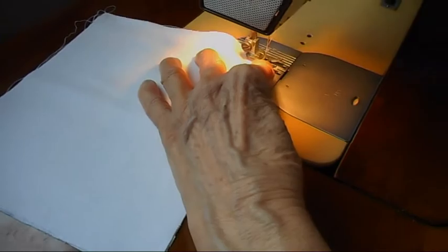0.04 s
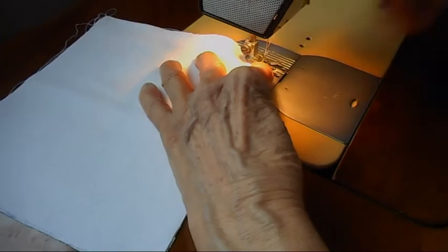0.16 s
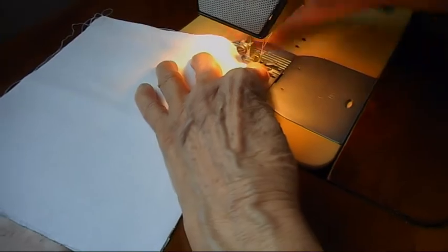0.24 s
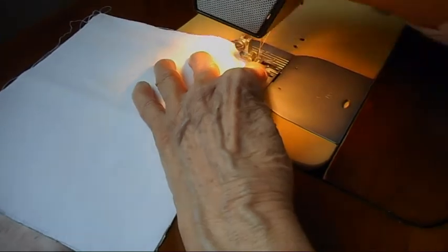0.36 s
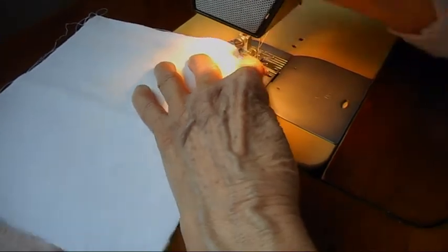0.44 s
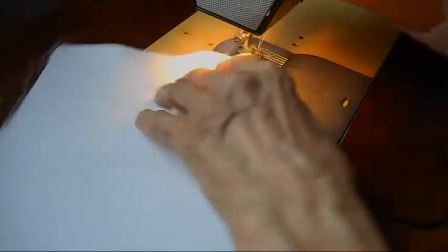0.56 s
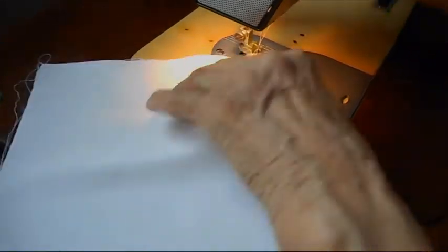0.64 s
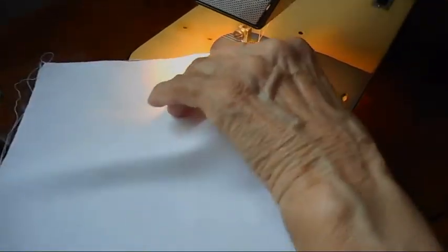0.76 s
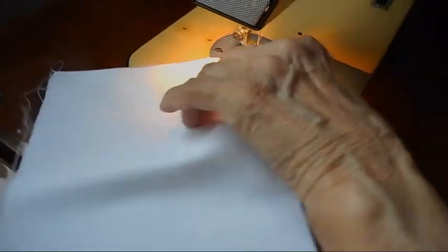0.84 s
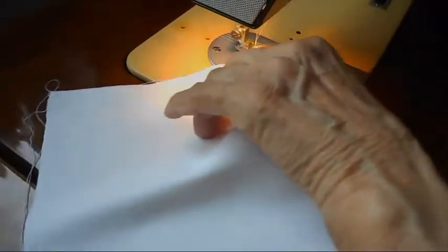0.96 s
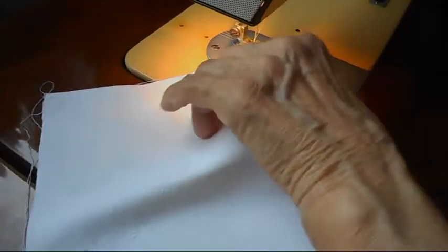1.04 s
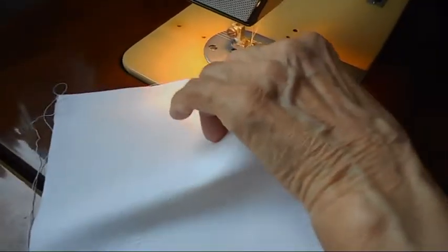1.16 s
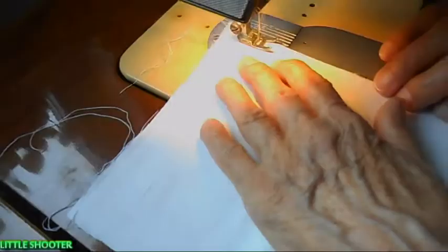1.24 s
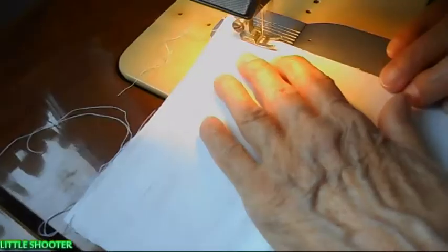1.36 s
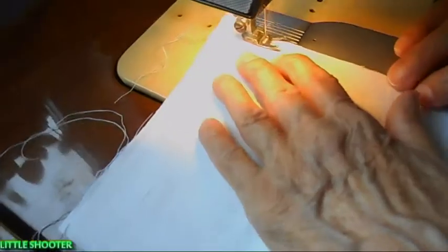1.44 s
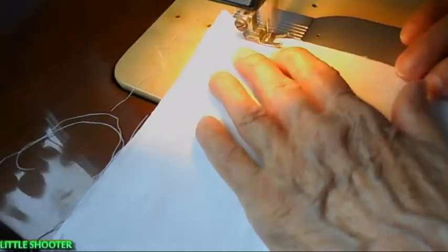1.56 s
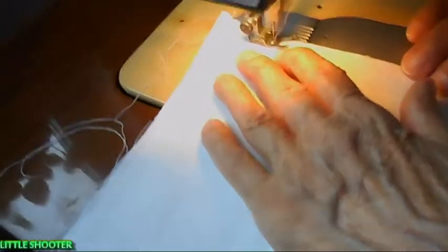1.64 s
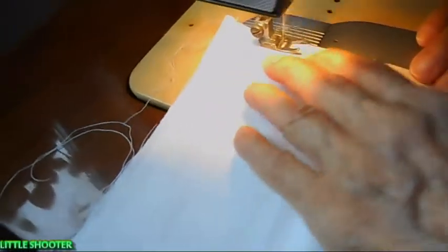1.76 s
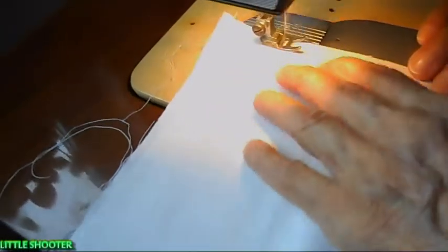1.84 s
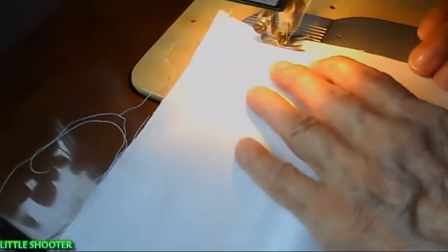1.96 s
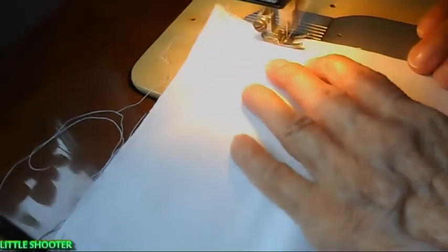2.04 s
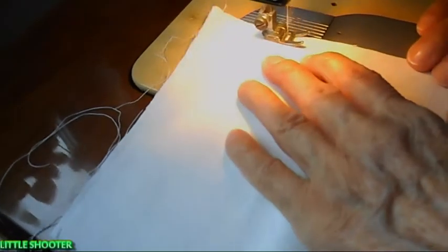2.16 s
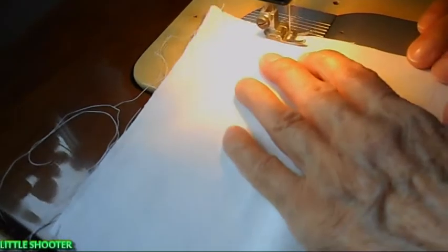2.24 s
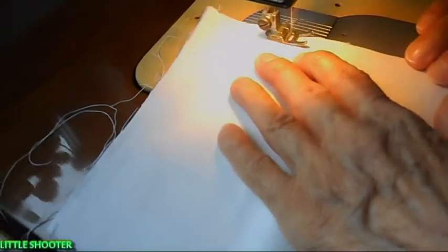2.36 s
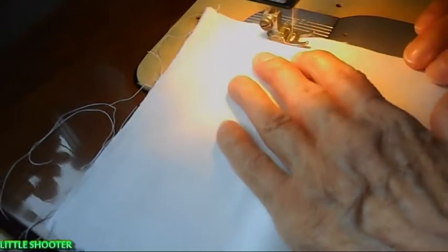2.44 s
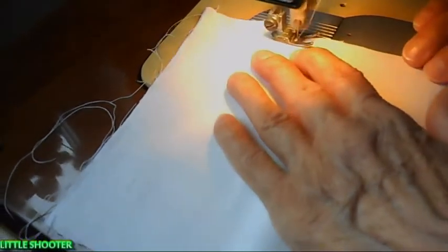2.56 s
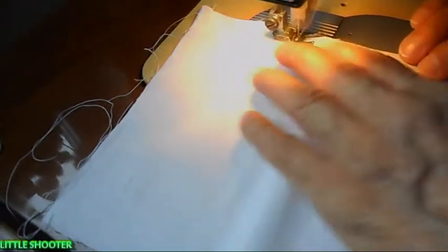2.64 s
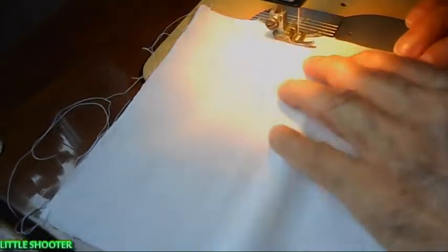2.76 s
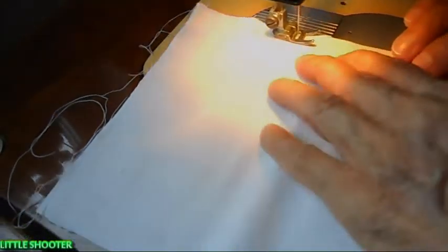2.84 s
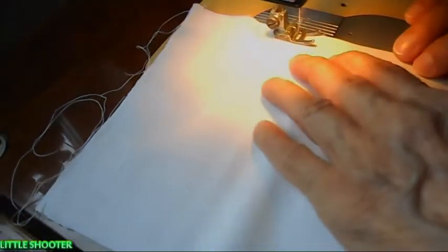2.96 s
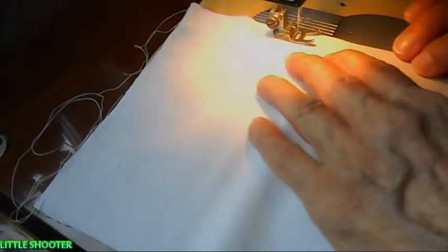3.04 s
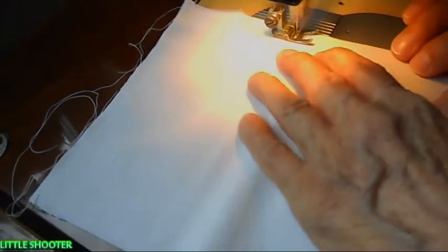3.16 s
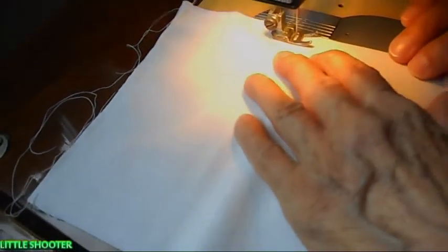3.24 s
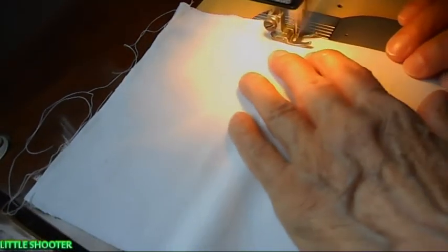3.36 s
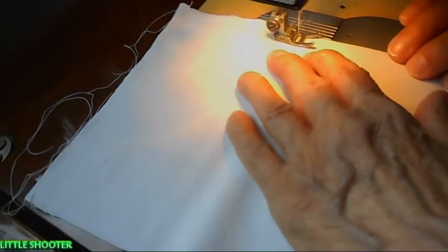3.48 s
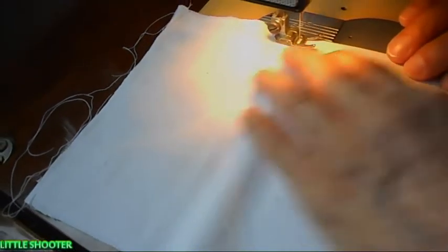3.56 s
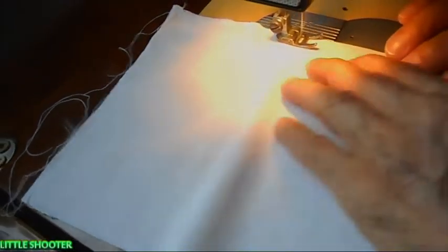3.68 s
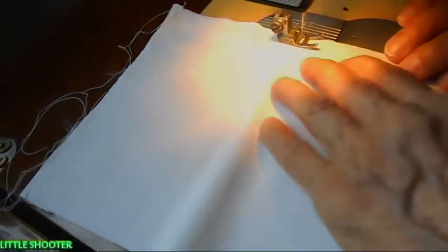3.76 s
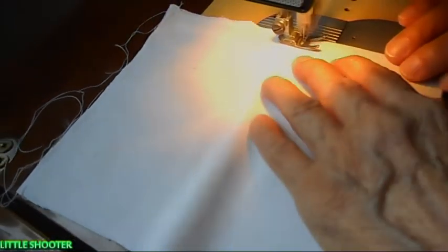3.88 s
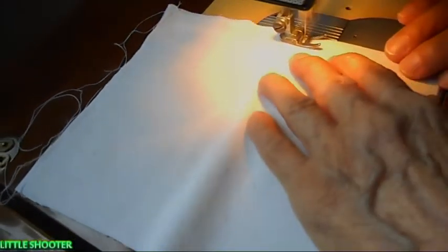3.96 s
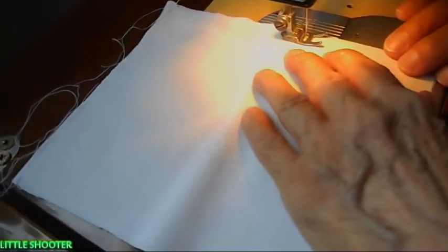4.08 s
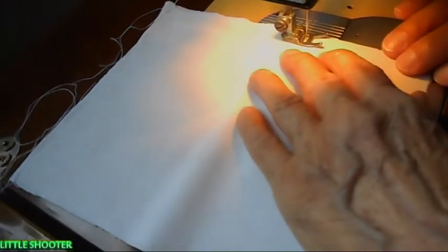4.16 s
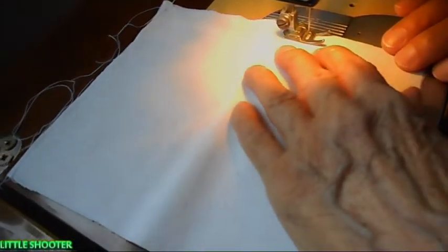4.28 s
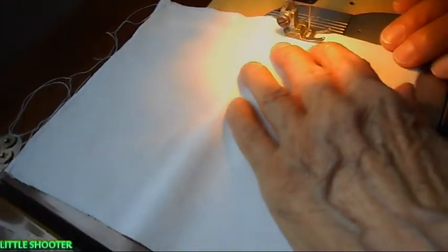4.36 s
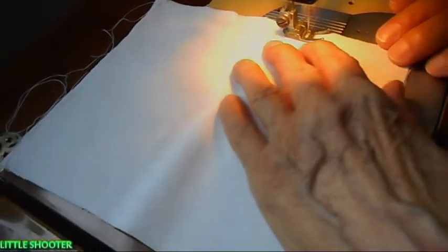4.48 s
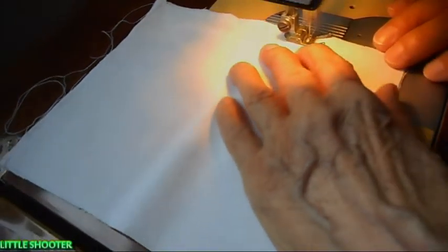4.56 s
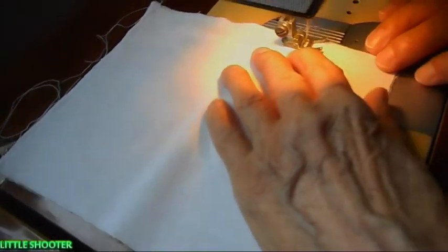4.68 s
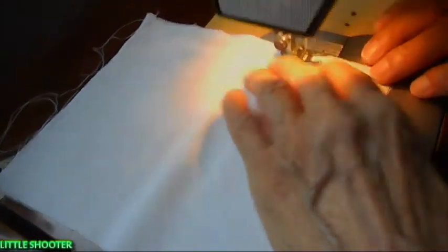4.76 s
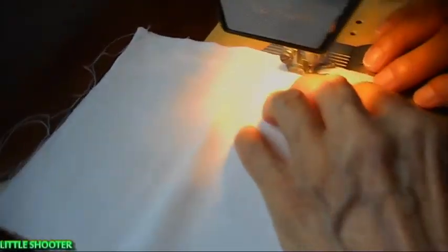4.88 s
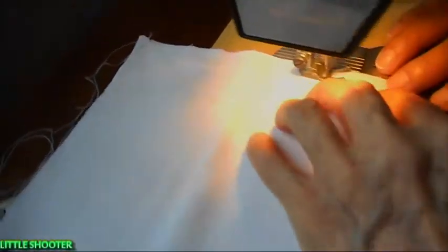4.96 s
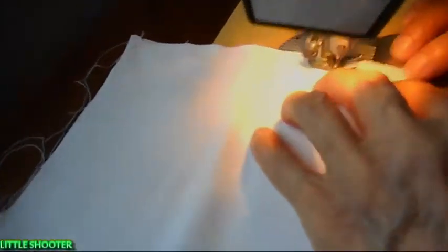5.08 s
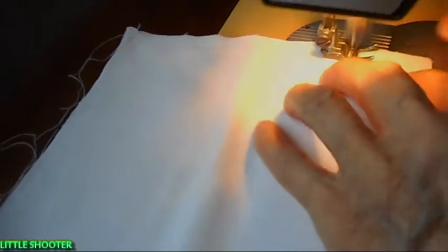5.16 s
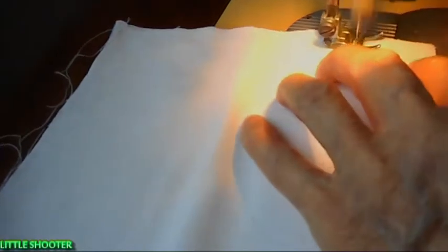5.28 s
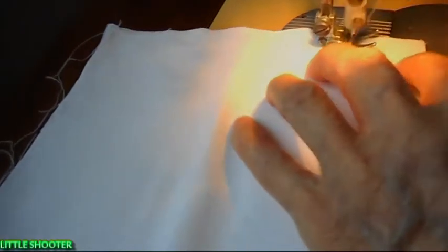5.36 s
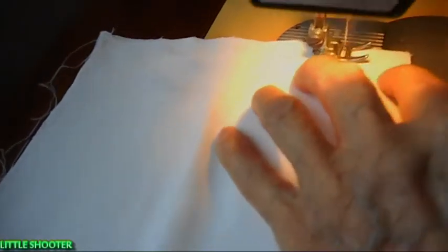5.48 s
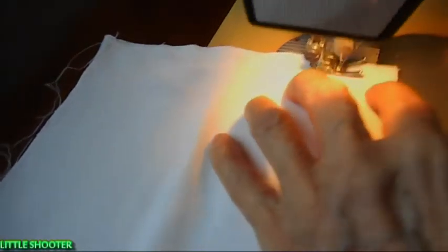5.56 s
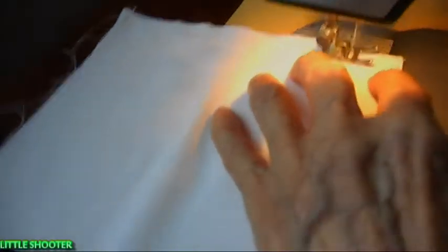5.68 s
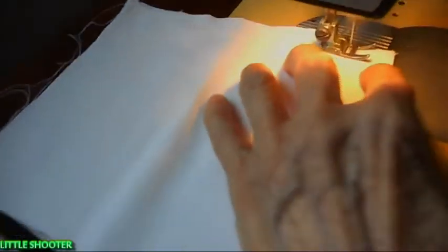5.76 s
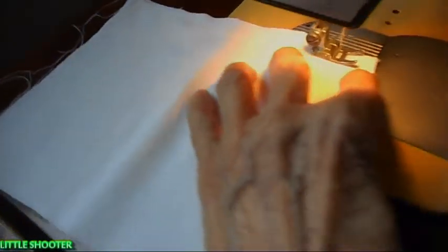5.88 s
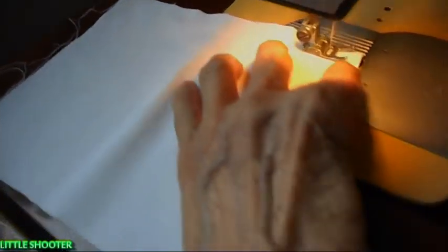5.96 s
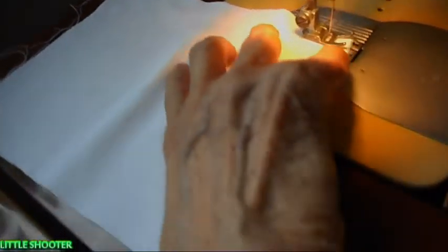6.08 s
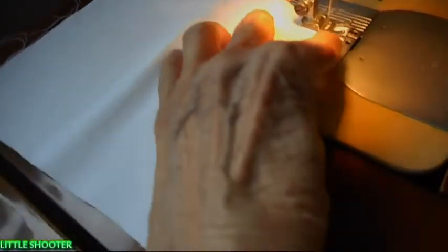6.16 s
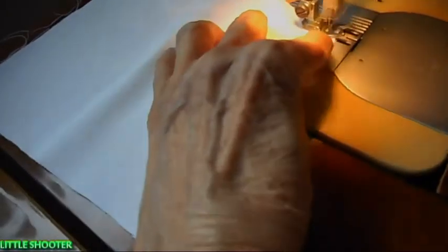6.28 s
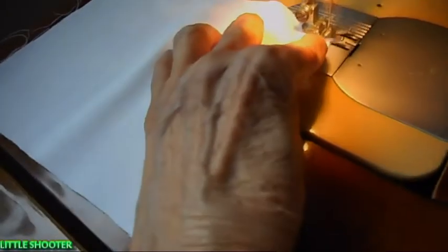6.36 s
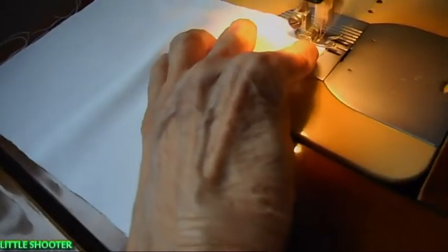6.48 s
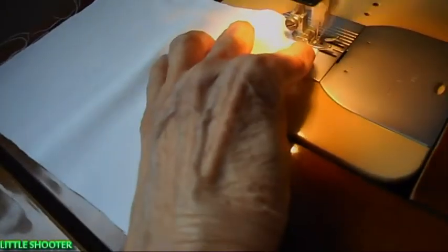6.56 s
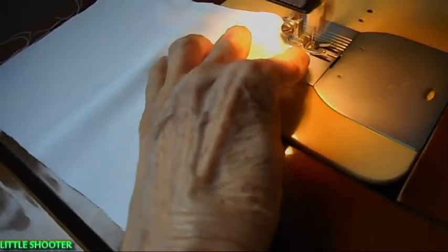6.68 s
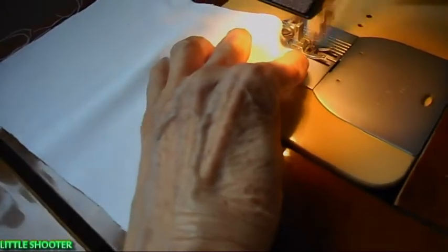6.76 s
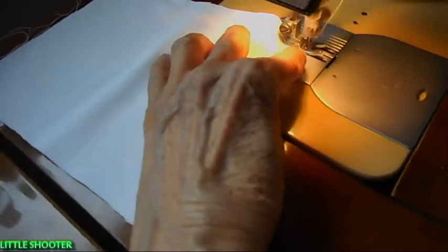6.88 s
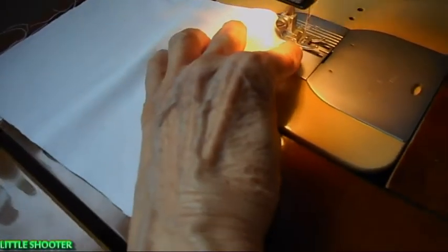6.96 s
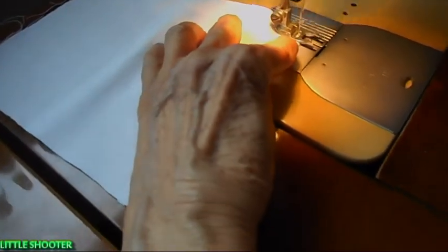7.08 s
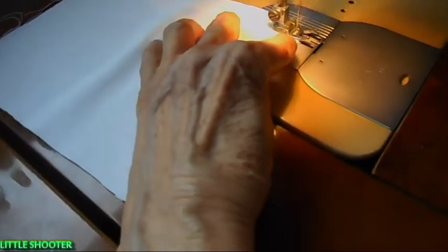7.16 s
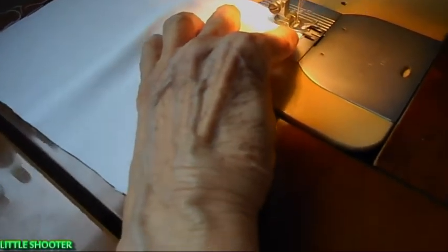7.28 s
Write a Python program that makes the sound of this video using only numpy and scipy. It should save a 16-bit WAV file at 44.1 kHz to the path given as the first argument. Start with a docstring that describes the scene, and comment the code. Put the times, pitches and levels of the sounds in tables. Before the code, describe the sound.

Metal clicks and two hard knocks on a hollow machine bed, a brief gap, then rapid sewing machine stitching with a clunk and scrape.

```python
"""A quiet room first, with the presser foot's lever clicking and two main knocks on the hollow machine bed.
After a short silent gap an electric sewing machine runs close to the microphone, about eleven stitches a second.
Its needle bar, hook and feed teeth clack over the rumble of motor and belt, with chatter, and once a heavy clunk
with a short rattle, then a brief metallic scrape.
Shaped noise makes room, rumble, clunk and scrape; bursts of noise through resonances make the other contacts."""
import sys
import numpy as np
from scipy import signal
from scipy.fft import rfft, irfft, next_fast_len
from scipy.io import wavfile
from scipy.ndimage import map_coordinates

SR = 44100
rng = np.random.default_rng(int(sys.argv[2]) if len(sys.argv) > 2 else 0)


def unload_wav(signal):
    """Save mono or channel-first audio to the path in sys.argv[1] as 16-bit WAV at rate SR, clipped to [-1, 1]."""
    wavfile.write(
        sys.argv[1],
        SR,
        np.round(np.clip(np.atleast_2d(signal).T, -1, 1) * 32767).astype(np.int16),
    )


N = 323253

# Levels and gains are relative dB. A t60 is the time in seconds to fall by 60 dB.
# Hiss of the quiet room. Each row: time in seconds, level in dB.
ROOM_LEVEL = [(0.0, -58), (.5, -55.5), (.55, -53), (.65, -55), (0.986, -54.5), (1.21, -53)]
# Colour of the room hiss. Each row: frequency in Hz, gain in dB.
ROOM_COLOUR = [(15, -53), (25, -23), (104, -11), (585, -3), (815, -3), (998, 0), (1390, -3), (3750, -4),
               (7830, -10.5), (9600, -18), (10900, -37), (14200, -68), (22000, -120)]
# Blows and rebounds on the bed. Each row: start in seconds, peak level in dB, t60 in seconds.
BED_KNOCKS = [(0.941, -8, 0.052), (0.949, -25, 0.16), (0.97, -14, 0.089), (0.989, -31, 0.091),
              (1.075, -8.5, 0.086), (1.102, -19.5, 0.064), (1.116, -30, 0.1), (1.204, -29, 0.1)]
# Colour of a blow. Each row: frequency in Hz, gain in dB.
BLOW_COLOUR = [(24, -64), (40, -44), (261, -13.5), (355, -20), (459, -7), (950, -5), (1670, -17),
               (3070, -28.5), (5270, -30.5), (10900, -52), (14200, -95), (22000, -120)]
# Resonances of the hollow bed. Each row: frequency in Hz, width in Hz, level in dB.
BED_MODES = [(462, 31, 2.5), (718, 38, 5), (962, 51, -3), (1121, 31, 2), (1640, 110, -3), (1943, 90, 5),
             (2760, 110, -1)]
# Lever and cloth handling. Each row: start in seconds, level in dB, loudest ring in Hz,
# thud against the contact in dB, t60 in seconds.
LEVER_CONTACTS = [(0.1484, -39, 3660, -16, 0.021), (0.161, -42, 4070, -20, 0.012),
                  (0.2523, -38, 2860, -20, 0.012), (0.309, -18, 3800, -42, 0.008),
                  (0.3416, -39.5, 3160, -2, 0.014), (0.3758, -24, 2140, -12, 0.018),
                  (0.3935, -24.5, 3870, -5, 0.021), (0.4306, -33, 3120, -17, 0.045),
                  (0.4677, -35, 2050, -3, 0.02), (0.546, -41, 2180, -10, 0.021),
                  (0.7053, -37.5, 5700, -8, 0.016), (0.8677, -38, 3080, -18, 0.014),
                  (1.1916, -38, 3290, -8, 0.018)]
# Silence before the machine. One row: start in seconds, end in seconds.
SILENT_GAP = (1.2135, 1.2525)
# The running machine. Each row: time in seconds, casing rumble in dB, chatter of small parts in dB.
RUNNING_LEVELS = [(1.25, -32, -30.5), (1.32, -33.5, -31.5), (1.42, -32, -31), (1.46, -33.5, -28.5),
                  (1.68, -33, -32), (1.93, -34, -31.5), (2.1, -32.5, -30.5), (3.72, -34, -31),
                  (4.3, -33, -30), (5.57, -33, -31.5), (6.06, -33.5, -30.5), (6.38, -33.5, -29.5),
                  (6.62, -33.5, -31), (6.96, -35.5, -35.5), (7.13, -34.5, -35.5), (7.33, -33.5, -31)]
# Colour of the rumble. Each row: frequency in Hz, gain in dB.
RUMBLE_COLOUR = [(25, -76), (100, -31), (250, -18), (420, -10.5), (900, -5), (1500, -5.5), (2500, -9.5),
                 (6000, -15.5), (10900, -70)]
# Resonances of the casing. Each row: frequency in Hz, width in Hz, level in dB.
CASING_MODES = [(518.2, 57, 5.5), (786, 46.5, 6), (1070, 182, -2.5), (1325, 61, 1.5)]
# Progress of the main shaft. Each row: time in seconds, stitches begun.
SHAFT_STITCHES = [(1.271, 0), (1.525, 3), (1.774, 6), (2.02, 9), (2.114, 10), (2.372, 13), (2.721, 17),
                  (2.975, 20), (3.425, 25), (3.875, 30), (4.217, 34), (4.4, 36), (4.784, 40), (5.332, 46),
                  (5.813, 51), (6.175, 55), (6.78, 62), (7.322, 67)]
# One turn of the shaft; the needle bar lands at 0, the feed teeth near .3.
# Each row: share of the stitch, usual t60 of a clack in seconds, its thud in dB, chatter in dB.
STITCH_CYCLE = [(0, .027, -14, 2.5), (.12, .016, -19.5, 1.5), (.29, .019, -7, 6), (.42, .013, -18, -0.5),
                (.58, .014, -22, -2), (.68, .014, -26, 4.5), (.77, .013, -10, -3.5), (.87, .012, -12, 0),
                (.95, .016, -24, 0.5)]
# Colour of metal on metal. Each row: frequency in Hz, gain in dB.
CONTACT_COLOUR = [(880, -22), (1500, -4.5), (3710, 1), (4090, -1), (6630, 0.5), (7440, 1.5), (9470, -9),
                  (9950, -13), (10900, -21.5), (14200, -67), (22000, -120)]
# Resonances of the steel parts. Each row: frequency in Hz, width in Hz, level in dB.
STEEL_MODES = [(2030, 220, -9), (2702, 100, 3.5), (3500, 100, -14), (4584, 65, 1), (5760, 310, -22),
               (7130, 120, -10), (7300, 330, -45)]
# Colour of a thud into the arm. Each row: frequency in Hz, gain in dB.
THUD_COLOUR = [(40, -62), (100, -35), (200, -13), (500, -13.5), (1000, -8.5), (1350, 5.5), (1700, -12),
               (2500, -33.5)]
# A heavy clunk with a short rattle, then a brief metallic scrape. Each row: start in seconds,
# length in seconds, level in dB, ring of the needle plate in dB, thud in the arm in dB.
CLUNK_AND_SCRAPE = [(6.516, 0.014, -21, -17, 6), (6.532, 0.044, -28, -19, -6), (6.598, 0.013, -17, 18, -8)]
# Resonances of the needle plate. Each row: frequency in Hz, width in Hz, level in dB.
PLATE_MODES = [(6880, 190, -8), (7310, 99, -6), (7400, 140, -6), (9600, 190, 5), (10200, 100, 5)]
# The loudest metal contacts. Each row: start in seconds, level in dB, loudest ring in Hz,
# length as a multiple of the usual one at that place in the stitch.
CLACK_EVENTS = [(1.2705, -14, 2950, 1.5), (1.297, -14.5, 2080, 1.05), (1.3404, -14.5, 2940, 0.9),
                (1.4411, -8.5, 3000, 1.05), (1.4774, -16, 6410, 0.91), (1.525, -13, 2720, 1.3),
                (1.555, -11, 6750, 0.99), (1.5825, -16, 5700, 0.76), (1.5924, -15.5, 5270, 1.1),
                (1.612, -11, 5940, 1.1), (1.656, -14, 5200, 1.2), (1.679, -9.5, 2940, 1.2),
                (1.6905, -10, 6000, 1.3), (1.7084, -13, 7300, 0.78), (1.728, -8.5, 6720, 0.98),
                (1.7418, -12.5, 3200, 1.05), (1.773, -8.5, 2240, 1.05), (1.8145, -12, 4400, 1.1),
                (1.844, -7, 6300, 1), (1.8556, -12, 2800, 1.2), (1.88, -7.5, 3300, 0.87),
                (1.9127, -14, 7440, 0.93), (1.938, -6.5, 2830, 0.84), (1.963, -0.5, 5850, 0.82),
                (1.9708, -9, 6700, 1.3), (2.0197, -9.5, 2840, 1.3), (2.0575, -5.5, 6700, 1.16),
                (2.1143, -6.5, 5970, 0.79), (2.14, -9, 6360, 1.2), (2.2358, -5.5, 6700, 1),
                (2.2892, -15.5, 5950, 1.2), (2.3085, -11, 3800, 0.76), (2.3374, -15, 5090, 1.05),
                (2.3725, -8.5, 7460, 0.65), (2.392, -15, 3990, 1.3), (2.4564, -9.5, 5600, 0.98),
                (2.4787, -23, 3900, 0.96), (2.6316, -14, 2700, 1.05), (2.6723, -13.5, 4370, 1.4),
                (2.7202, -7.5, 5870, 1.05), (2.7487, -12.5, 6820, 1.05), (2.9107, 0, 4700, 0.92),
                (2.9744, -9, 2703, 1.15), (3.0016, -5, 2060, 1.02), (3.066, -6, 5800, 0.62),
                (3.0964, -11.5, 6500, 1.2), (3.1817, -3, 5150, 1.13), (3.243, -9.5, 5840, 1.05),
                (3.2668, -11, 1960, 1.1), (3.4246, -10, 2600, 0.79), (3.4517, -1.5, 3750, 0.97),
                (3.5886, -13, 3300, 0.94), (3.6416, -11, 6250, 1.05), (3.6601, -16, 5620, 1.6),
                (3.715, -22, 3570, 1.2), (3.8153, -16.5, 4540, 1.5), (3.8546, -14.5, 5120, 1.1),
                (3.8766, -9.5, 2670, 0.78), (3.8967, -10.5, 5190, 1.3), (3.9634, -12, 3120, 1.05),
                (4.0073, -12, 4470, 0.93), (4.0494, -7, 6180, 0.93), (4.0694, -13.5, 3740, 1.05),
                (4.083, -12.5, 4360, 1.1), (4.161, -11, 3770, 0.66), (4.1756, -12, 5140, 1.05),
                (4.2068, -11, 6600, 1.4), (4.2166, -8.5, 5900, 0.88), (4.25, -10, 6860, 1.7),
                (4.321, -12, 6960, 0.66), (4.349, -16, 3180, 0.87), (4.377, -12.5, 2940, 1.3),
                (4.4079, -5, 6400, 0.79), (4.445, -12, 7470, 0.75), (4.4807, -5.5, 3660, 1.2),
                (4.5423, -12, 3020, 1.6), (4.576, -7.5, 1900, 1.14), (4.6115, -13, 7400, 1.05),
                (4.624, -5, 5760, 1.3), (4.659, -12, 6840, 0.72), (4.728, -14, 3300, 1.3),
                (4.785, -6.5, 5900, 1.03), (4.815, 0, 5900, 1.1), (4.8762, -9, 5640, 1.3),
                (4.9343, -14.5, 3250, 1.4), (4.9668, -8.5, 5730, 0.96), (4.981, -9, 6700, 0.83),
                (5.0594, -8, 2270, 0.82), (5.0821, -10.5, 3570, 0.67), (5.0938, -11, 1930, 0.71),
                (5.1459, -8, 2730, 1.14), (5.1806, -12, 6220, 1.05), (5.243, -12.5, 2200, 0.85),
                (5.2683, -9.5, 4600, 1.6), (5.3307, -11.5, 2170, 1.3), (5.36, -14.5, 4520, 0.83),
                (5.5542, -12, 3760, 0.71), (5.6521, -13.5, 6600, 1.2), (5.7176, -5.5, 6070, 0.64),
                (5.741, -17, 4420, 1.1), (5.7803, -14.5, 3330, 1.05), (5.813, -14, 2260, 1.4),
                (5.831, -7.5, 3670, 1.4), (6.0373, -12.5, 6850, 1.05), (6.199, -12.5, 7130, 1.05),
                (6.222, -14, 7070, 0.98), (6.244, -16, 2620, 1.05), (6.2755, -19, 3590, 0.93),
                (6.2954, -13, 6750, 1.3), (6.3915, -7.5, 7040, 1.05), (6.4215, -14, 3650, 0.92),
                (6.4496, -7.5, 7160, 0.98), (6.4648, -12.5, 3530, 1.05), (6.477, -13, 6950, 1.05),
                (6.5192, -4, 2230, 1.76), (6.5968, -4, 7300, 1), (6.6486, -13, 2960, 1.5),
                (6.779, -8.5, 7080, 1.11), (6.8847, -9, 4530, 0.78), (6.9272, -14, 2470, 1.6),
                (6.999, -13.5, 6540, 0.85), (7.016, -14, 2010, 1.6), (7.1071, -12.5, 3610, 1.3),
                (7.13, -11.5, 4580, 0.69), (7.215, -10.5, 5560, 1.3), (7.2523, -9, 6710, 0.84),
                (7.302, -20, 7270, 0.78)]
# Gentle low cut below 90 Hz and roll-off of the converter. Each row: frequency in Hz, gain in dB.
BAND_EDGES = [(25, -4), (90, 0), (200, 0), (9000, -0.5), (10500, -5), (10850, -15), (11025, -26)]
# The converter's mirror image of the treble. Each row: frequency in Hz, gain in dB.
MIRROR_GAIN = [(11000, -1), (11400, -4.5), (11900, -4.5), (12500, -9.5), (14000, -19), (15300, -32.5),
               (15800, -49), (16600, -75)]
TOP_HZ = 16600  # nothing is kept from here up
CLACK_TRIM_DB = -1  # level trim of every clack


def amp(db):
    """Amplitude factor of a level in dB."""
    return 10 ** (np.asarray(db) / 20)


def unit(x):
    """Signal scaled to an rms of 1 along its last axis."""
    return x / np.sqrt(np.mean(x ** 2, axis=-1, keepdims=True) + 1e-20)


def along(points, hz):
    """Gain of (Hz, dB) points on a log axis."""
    f, db = np.transpose(points)
    return amp(np.interp(np.log(hz + 1), np.log(f + 1), db))


def curves(rows):
    """One value per sample for each column after the time."""
    s, *cols = np.transpose(rows)
    return [np.interp(np.arange(N) / SR, s, c) for c in cols]


def wobble(rate):
    """A smooth random curve, rate knots a second."""
    knots = rng.standard_normal(int(N * rate / SR) + 4)
    return map_coordinates(knots, [np.arange(N) * rate / SR])


def filtered(x, response):
    """Each row of x times a response of frequency."""
    n = x.shape[-1]
    m = next_fast_len(n + 2048)  # zeros leave room for the ringing
    return irfft(rfft(x, m) * response(np.fft.rfftfreq(m, 1 / SR)), m)[..., :n]


def peak(f, hz, width_hz):
    """One causal resonance of gain 1."""
    return 1j * f * width_hz / (hz * hz - f * f + 1j * f * width_hz)


def modes(f, table, scatter_db):
    """Resonances of a body, alternating in sign; scatter_db holds one level change per mode."""
    total = 0
    for k, (hz, width_hz, db) in enumerate(table):
        strength = amp(db + scatter_db[..., k, None])
        total = total + (-1) ** k * strength * peak(f, hz, width_hz)
    return total


def bursts(t60, rise, bend, size):
    """One row of noise per contact: a quick rise, then a decay that steepens if bend is over 1."""
    t = np.arange(size) / SR
    decay_db = -60 * (t / np.clip(t60, .004, .4)[:, None]) ** bend
    return rng.standard_normal((len(t60), size)) * (1 - np.exp(-t / rise)) * amp(decay_db)


def place(s, rows):
    """Rows summed into one track from their times on."""
    at = np.round(s * SR).astype(int)[:, None] + np.arange(rows.shape[1])
    return np.bincount(at.ravel(), rows.ravel(), N + SR)[:N]


def contacts(table, size):
    """Each contact scrapes briefly, rings the steel parts at new strengths and thuds into the arm."""
    s, db, ring_hz, thud_db, t60 = np.transpose(table)
    scatter_db = 5 * rng.standard_normal((len(s), len(STEEL_MODES)))
    tilt = 0.12 * np.log(ring_hz[:, None] / 4000)  # small parts ring high and sound thin

    def steel(f):
        scrape = along(CONTACT_COLOUR, f) * ((f + 100) / 4000) ** tilt
        ring = modes(f, STEEL_MODES, scatter_db) + 1.87 * peak(f, ring_hz[:, None], 223)
        return scrape * (0.62 + ring)

    # longer contacts hold more energy at one peak level
    energy = np.sqrt(np.clip(t60, .004, .4) * SR / size)[:, None]
    rise = 0.068 * t60[:, None]  # parts that settle slowly also close slowly
    clack = energy * unit(filtered(bursts(t60, rise, 1.39, size), steel))
    thud = energy * unit(filtered(bursts(t60, rise, 1.44, size), lambda f: along(THUD_COLOUR, f)))
    rows = amp(db - 14.5)[:, None] * (clack + amp(thud_db + 1.5)[:, None] * thud)
    return place(s - .0008, rows)


def in_stitch(s):
    """The columns of STITCH_CYCLE at times s, read at the shaft's place within its stitch."""
    share, *cols = np.transpose(STITCH_CYCLE)
    turns = np.interp(s, *np.transpose(SHAFT_STITCHES))
    return [np.interp(turns % 1, share, c, period=1) for c in cols]


def room():
    """Room hiss with a faint rustle of cloth: noise of uneven strength, coloured by the air."""
    rustle = rng.standard_normal(N) * amp(1.3 * wobble(40))
    return amp(curves(ROOM_LEVEL)[0]) * unit(filtered(rustle, lambda f: along(ROOM_COLOUR, f)))


def echoes(x, t60, level_db):
    """The near walls answer with a short, even tail."""
    t = np.arange(SR // 4) / SR
    tail = rng.standard_normal(len(t)) * amp(-60 * t / t60)
    return x + amp(level_db) * signal.fftconvolve(x, tail / np.linalg.norm(tail))[:N]


def lever():
    """The presser foot's lever and the cloth give short contacts that ring and thud."""
    return contacts(LEVER_CONTACTS, size=4096)


def knocks():
    """Each blow rattles the hollow bed and sets off its resonances at new strengths."""
    s, db, t60 = np.transpose(BED_KNOCKS)
    scatter_db = 3 * rng.standard_normal((len(s), len(BED_MODES)))
    bed = lambda f: along(BLOW_COLOUR, f) * (0.52 + modes(f, BED_MODES, scatter_db))
    rows = filtered(bursts(t60, 0.0012, 1.08, size=8192), bed)
    rows = rows / np.abs(rows).max(axis=1, keepdims=True)
    return place(s - .002, amp(db - 4)[:, None] * rows)


def rumble():
    """Motor and belt shake the casing unevenly; it answers at its own pitches."""
    shake = rng.standard_normal(N) * amp(1.66 * wobble(35) + 0.58 * wobble(110))
    even = np.zeros(len(CASING_MODES))
    casing = lambda f: along(RUMBLE_COLOUR, f) * (1 + 2.46 * modes(f, CASING_MODES, even))
    return amp(curves(RUNNING_LEVELS)[0] + 0.5) * unit(filtered(shake, casing))


def chatter():
    """Many weak random contacts, swelling and easing within each stitch, over a steadier metallic hiss."""
    level_db = curves(RUNNING_LEVELS)[1]
    at = np.arange(0, N, SR // 300)  # about 300 contacts a second
    draw = rng.random((len(at), 5))
    s = at / SR + .002 + .008 * draw[:, 0]
    db = 11 * draw[:, 1] ** 2.2 + in_stitch(s)[2]
    ring_hz = 2200 * 3.6 ** draw[:, 2] ** .7
    thud_db = -18 + 9 * draw[:, 3]
    t60 = .004 + .009 * draw[:, 4]
    ticks = unit(contacts(np.c_[s, db, ring_hz, thud_db, t60], size=768))
    hiss = unit(filtered(rng.standard_normal(N), lambda f: along(CONTACT_COLOUR, f)))
    return amp(level_db + 0.05) * ticks + amp(level_db - 9) * hiss


def clunk_and_scrape():
    """Noise let through abruptly rings the needle plate and thuds in the arm: clunk, rattle, then scrape."""
    t, out = np.arange(N) / SR, np.zeros(N)
    for s, length, db, plate_db, thud_db in CLUNK_AND_SCRAPE:
        gate = np.clip(np.minimum(t - s, s + length - t) / 0.0018, 0, 1)

        def colour(f):
            plate = modes(f, PLATE_MODES, np.full(len(PLATE_MODES), plate_db))
            return along(CONTACT_COLOUR, f) * (0.41 + plate) + amp(thud_db) * along(THUD_COLOUR, f)

        out += amp(db) * gate * unit(filtered(rng.standard_normal(N), colour))
    return out


def clacks():
    """Where in the stitch a clack falls sets how long it usually lasts and how hard it thuds."""
    s, db, ring_hz, longer = np.transpose(CLACK_EVENTS)
    t60, thud_db, _ = in_stitch(s + 0.0028)
    return contacts(np.c_[s, db + CLACK_TRIM_DB, ring_hz, thud_db, t60 * longer], size=4096)


def scene():
    """The quiet scene stops, and after a gap the running machine starts at once."""
    t = np.arange(N) / SR
    gap_start, gap_end = SILENT_GAP
    handling = echoes(knocks() + lever(), t60=.16, level_db=-8.5)
    machine = rumble() + chatter() + clunk_and_scrape() + clacks()
    before = np.clip((gap_start - t) / 0.0024, 0, 1) * (room() + handling)
    after = np.clip((t - gap_end) / 0.00082, 0, 1) * machine
    return (before + after)[None]


def record(dry):
    """A converter at half rate: nothing passes above a quarter of SR but a weak mirror image of the treble below."""
    sound = filtered(dry, lambda f: along(BAND_EDGES, f) * (f < SR / 4))
    flipped = sound * (-1.) ** np.arange(N)  # alternating signs turn the spectrum upside down
    image = filtered(flipped, lambda f: along(MIRROR_GAIN, f))
    return filtered(np.clip(sound + image, -1, 1), lambda f: f < TOP_HZ)


dry = scene()
out = record(dry)
unload_wav(out)
```